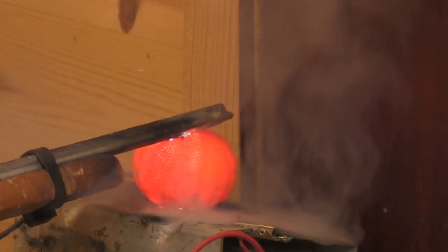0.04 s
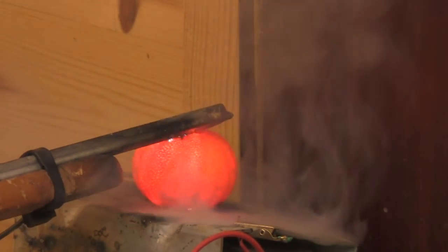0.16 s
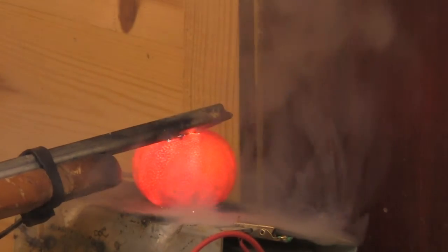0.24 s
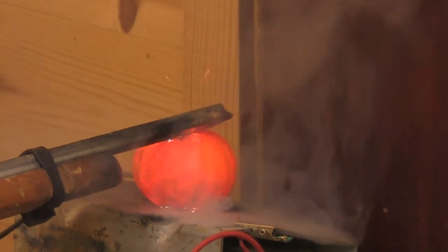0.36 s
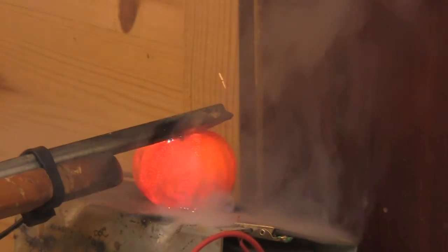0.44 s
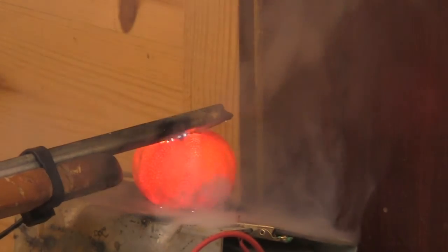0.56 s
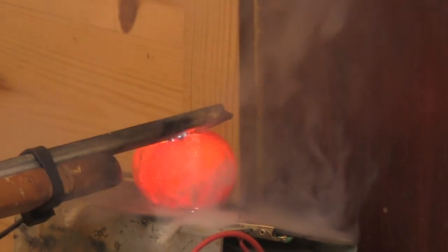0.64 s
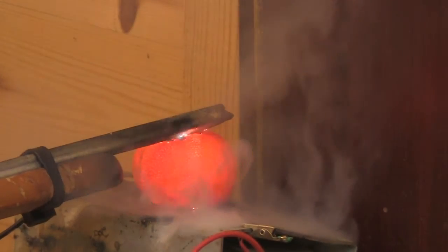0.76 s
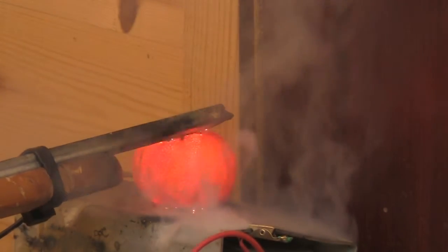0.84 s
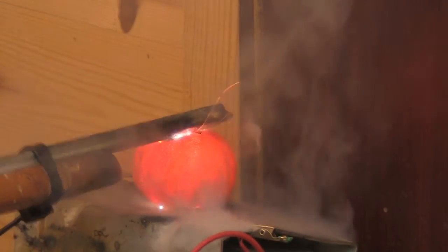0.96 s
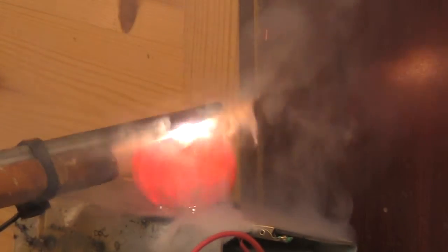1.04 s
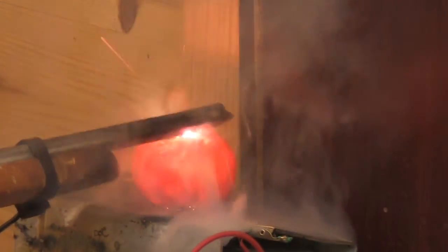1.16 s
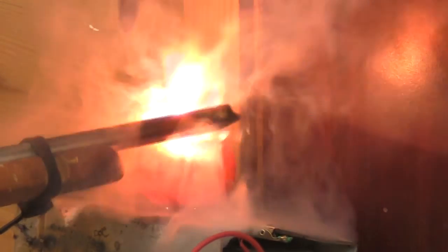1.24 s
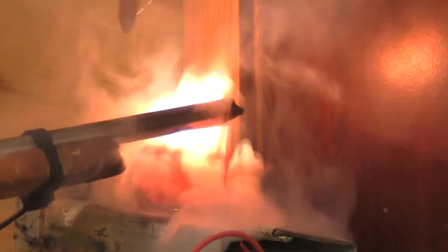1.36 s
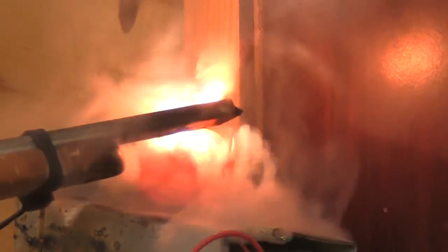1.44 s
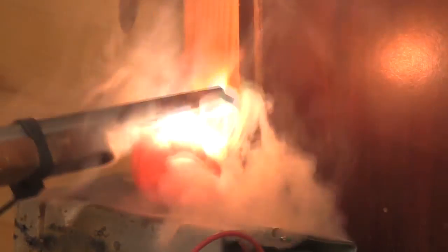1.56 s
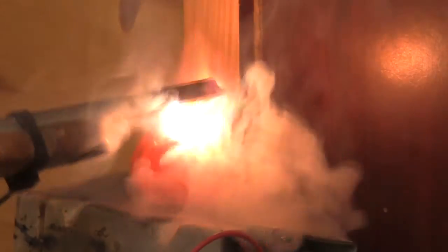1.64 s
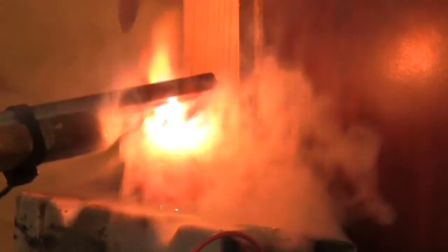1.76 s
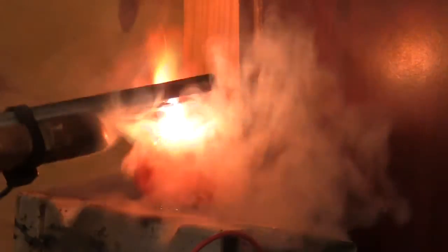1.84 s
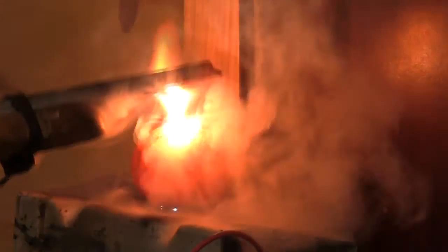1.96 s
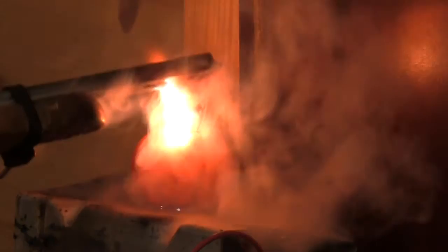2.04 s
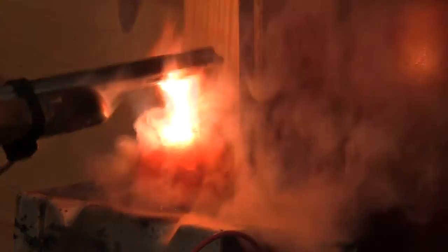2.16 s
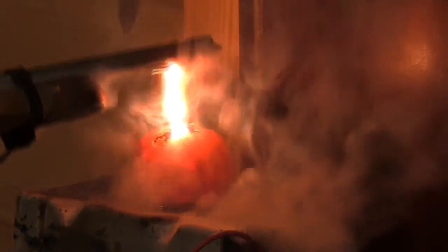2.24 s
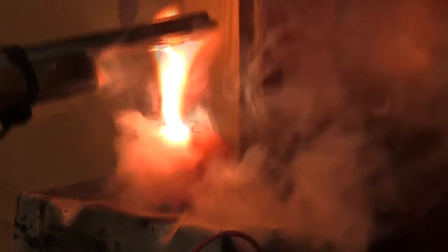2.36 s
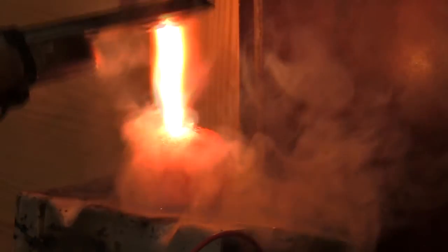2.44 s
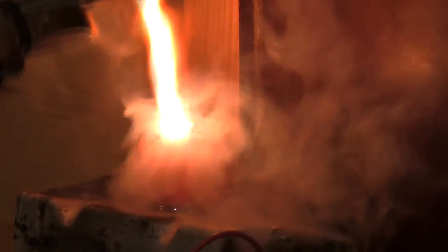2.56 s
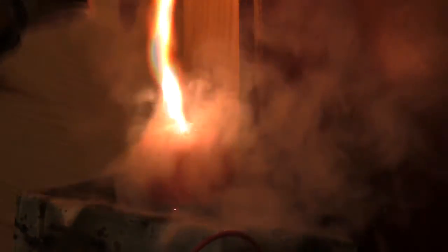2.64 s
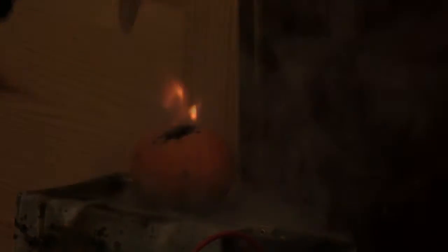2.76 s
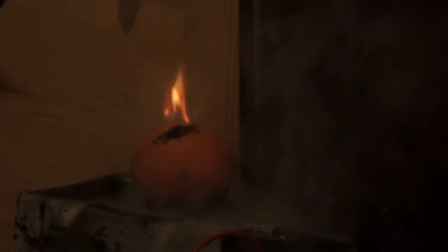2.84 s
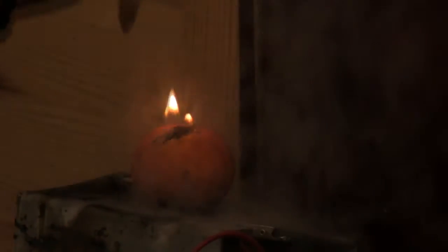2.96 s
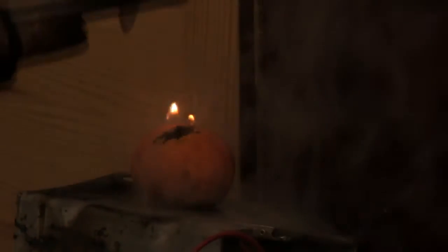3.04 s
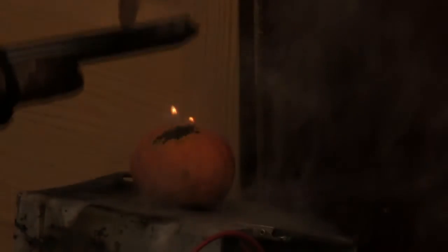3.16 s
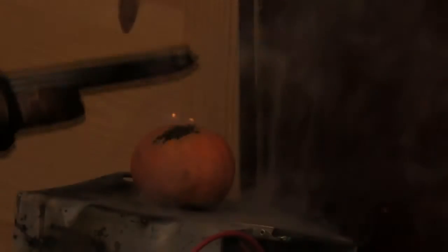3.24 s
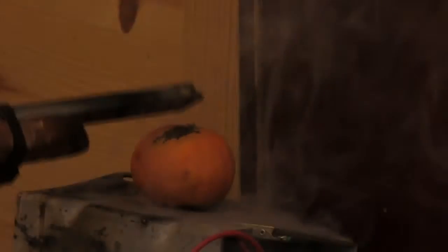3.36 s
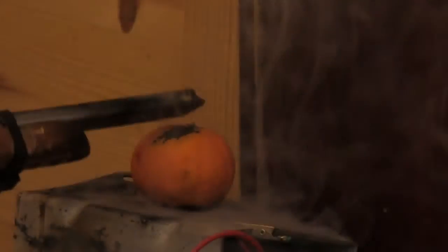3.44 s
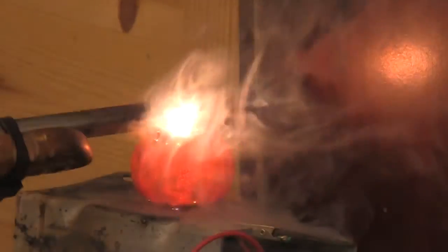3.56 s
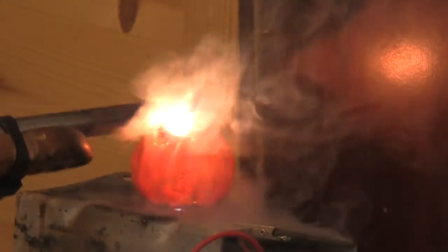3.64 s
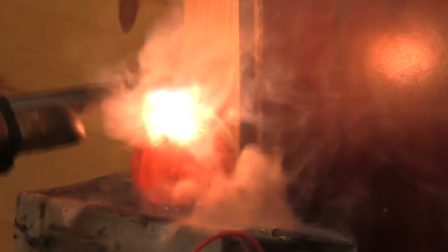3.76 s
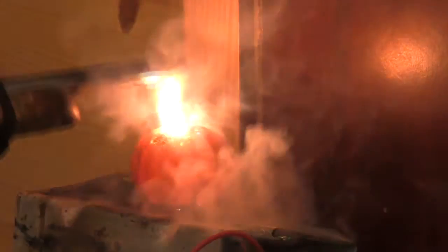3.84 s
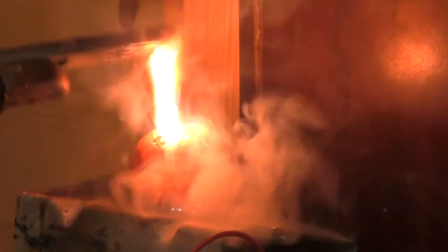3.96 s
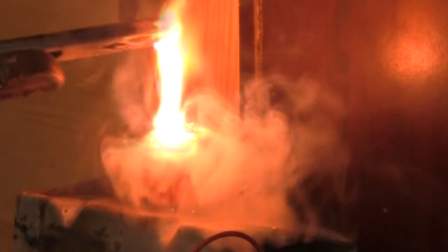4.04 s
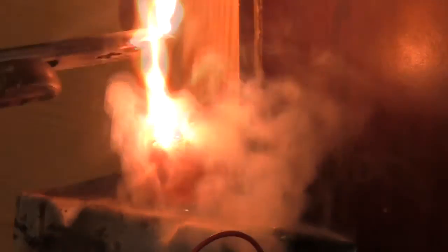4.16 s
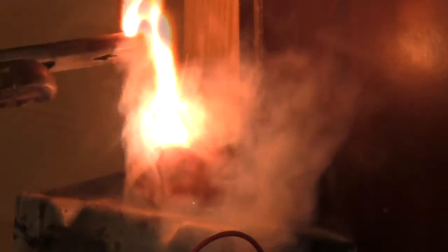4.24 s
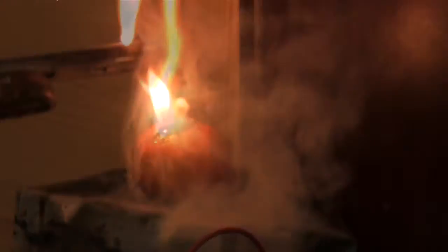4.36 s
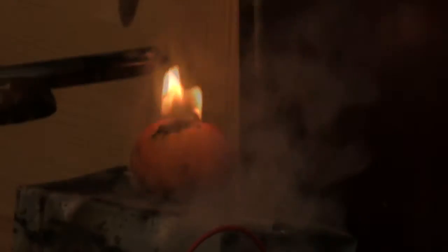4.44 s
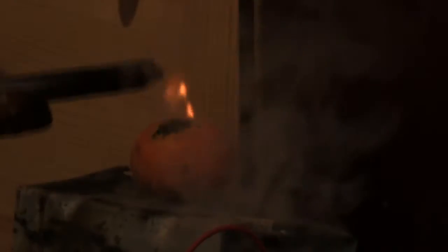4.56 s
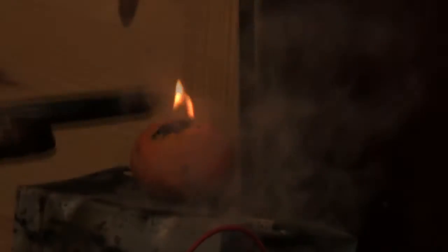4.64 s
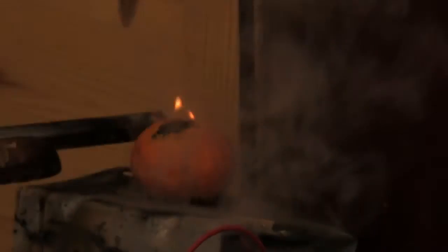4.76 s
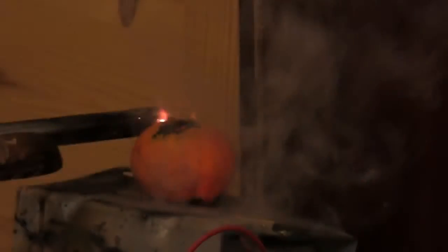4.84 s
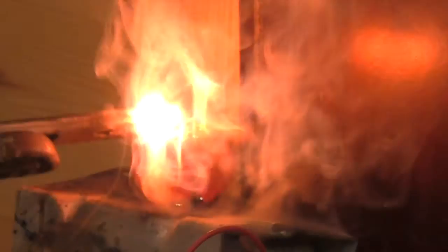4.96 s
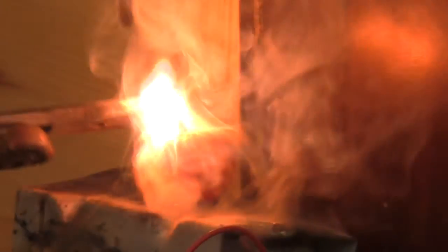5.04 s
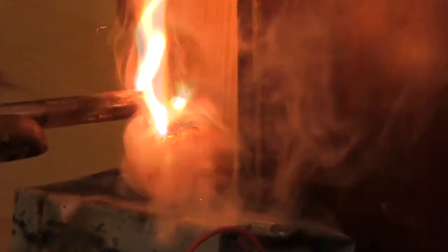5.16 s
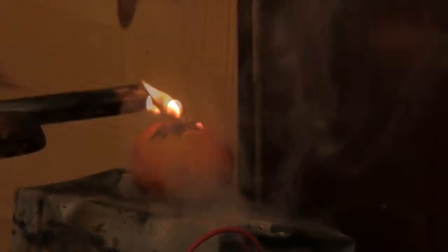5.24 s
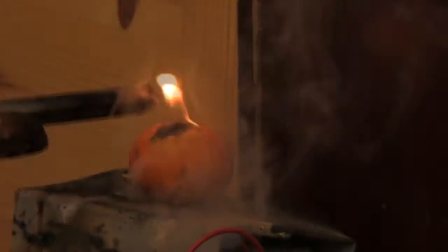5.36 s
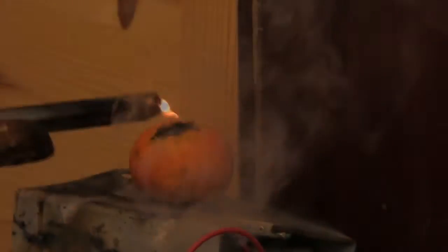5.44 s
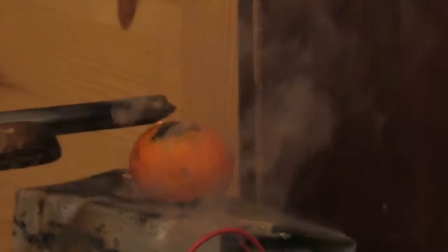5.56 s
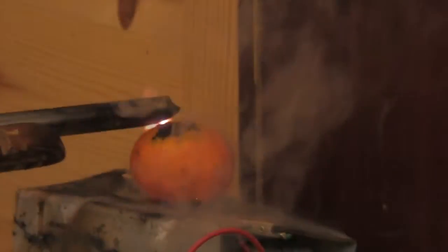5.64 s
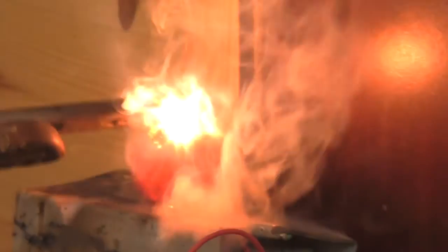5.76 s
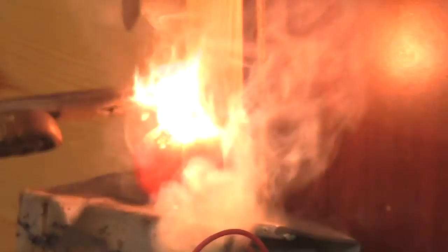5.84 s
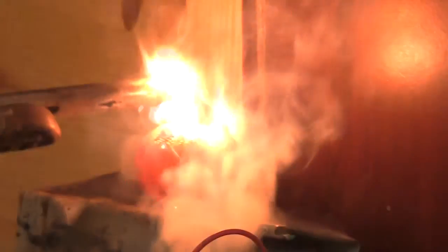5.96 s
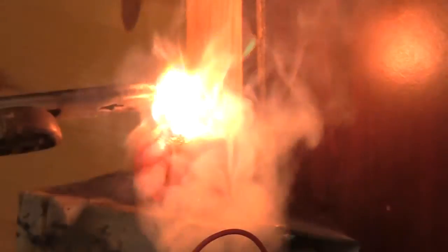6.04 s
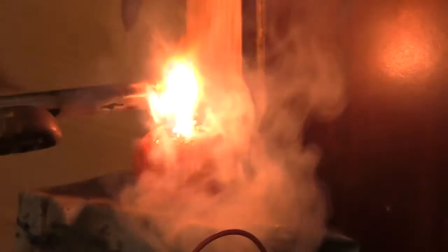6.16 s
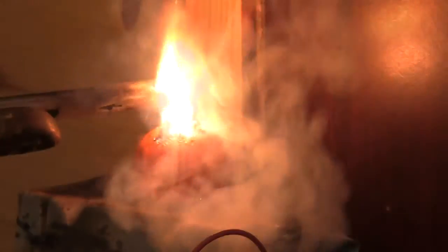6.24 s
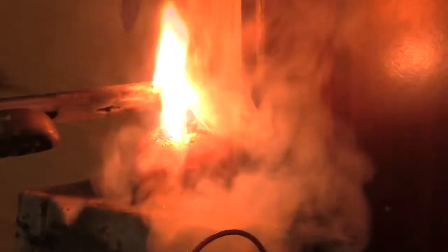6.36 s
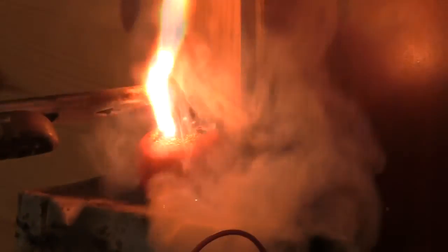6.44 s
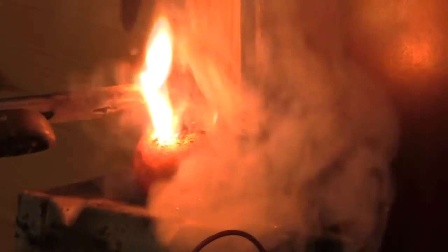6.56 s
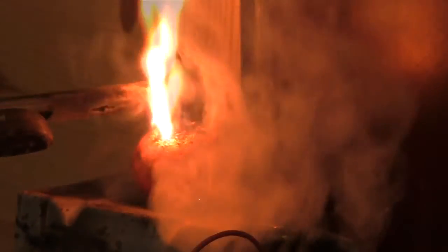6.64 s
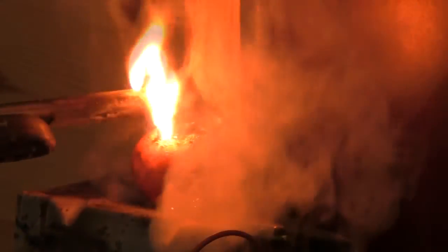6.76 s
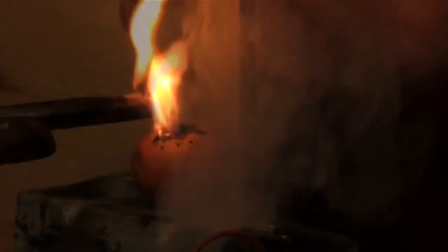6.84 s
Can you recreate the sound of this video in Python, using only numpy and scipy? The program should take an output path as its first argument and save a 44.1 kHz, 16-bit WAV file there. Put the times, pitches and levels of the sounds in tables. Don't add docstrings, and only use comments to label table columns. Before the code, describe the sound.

Heard close up in stereo in a small room, a harsh 100 Hz mains buzz and bright, pulsing sizzle of boiling juice are running from the start. A sharp crack comes at 1.1 s; around 1.25 s flame bursts through with a roar, steam and a cluster of pops until 1.65 s. The buzz grows fuller and rougher, with more snaps near 2.0 and 2.5-2.6 s. At 2.77 s it stops abruptly, leaving faint transformer hum, a little spitting and simmer. The arc slams back at 3.6 s and cuts at 4.44 s. A weak, crackling restrike at 4.81 s catches with a whoosh at 5.0 s and dies at 5.23 s. Quiet hum and a soft drop hiss at 5.5 s follow. At 5.65 s it restarts with rapid pops, the loudest crack at 5.75 s, then buzzes steadily with another pop at 6.6 s, ending abruptly about 6.9 s into quiet hum.

```python
import sys
import numpy as np
from scipy import signal
from scipy.fft import rfft, irfft
from scipy.io import wavfile
from scipy.ndimage import uniform_filter1d

SR = 44100
rng = np.random.default_rng(int(sys.argv[2]) if len(sys.argv) > 2 else 0)


def persist_wave(psi):
    counts = np.round(np.clip(psi, -1, 1) * 32767).astype(np.int16)
    wavfile.write(sys.argv[1], SR, np.atleast_2d(counts).T)


def field_ratio(decibels):
    return 10 ** (np.asarray(decibels, dtype=float) / 20)


N = 304731
T, HZ = np.arange(N) / SR, np.fft.rfftfreq(N, 1 / SR)
MAINS_HZ = 49.86
TURN = 2 * np.pi * MAINS_HZ * T - 1.96
BUZZ_FALL_DB_S = 211

# (strike [s], break [s], one-sidedness of the current [dB], fine fizz [dB])
BURNS = [
    (0, 2.765, -13, -16),
    (3.592, 4.436, -15, -14),
    (4.812, 5.233, -17, -13),
    (5.647, 6.897, -17, -13),
]


def buzz():
    # (harmonic [multiple of mains], index of its drive [0-3], level [dB])
    harmonics = [(2, 3, 1.5), (3, 1, -17), (4, 0, 0.5), (5, 1, 2), (6, 0, -9), (7, 1, -19.5), (8, 2, -3),
                 (9, 1, -30), (10, 2, -3), (12, 2, -20.5), (13, 2, -16.5), (14, 2, -11.5), (18, 2, -23.5)]
    on, after, current_db, _, length, odd_db, _ = arc()
    touch_s, lift_s = 0.83, 0.3
    touch = np.clip(1 - (T - touch_s) / lift_s, 0, 1)

    odd_drive_db = odd_db + 10 * touch
    long_db = -19 + 16 * length
    second_db = -33 + 21.5 * length ** 1.9 - 16 * touch
    second_fall_db_s = 26
    second_db = second_db + (BUZZ_FALL_DB_S - second_fall_db_s) * after
    drives_db = [0 * T, odd_drive_db, long_db, second_db]
    waver = 1 + 0.06 * drift(27)
    wander_db = (0.12, 0.8, 0.95, 0.65)
    drives_db = [db + wander * drift(2.5) for db, wander in zip(drives_db, wander_db)]

    lag = 1.3
    wave = 0 * T
    for k, which, db in harmonics:
        wave += field_ratio(db + drives_db[which]) * np.cos(k * TURN - lag * (k > 4))

    inrush_db, inrush_t60 = -53.5, 0.55
    inrush = bursts([(strike, inrush_db, inrush_t60) for strike, *_ in BURNS[1:]], 0.02)
    jolt = field_ratio(inrush) * np.cos(2 * TURN)
    level = on * field_ratio(current_db - BUZZ_FALL_DB_S * after)
    return -np.sqrt(2) * (level * waver * wave + jolt)


def hiss():
    # (frequency [Hz], level [dB per Hz])
    sizzle_tone = [(3000, -26.5), (4500, -5.5), (5700, -5.5), (6700, 0), (7300, -1.5), (8300, 2),
                   (9600, 1.5), (10500, -2.5), (11400, -29.5)]
    fizz_tone = [(10000, -29.5), (11000, 4.5), (12500, 0.5), (13200, -5), (14900, -32), (15700, -35.5)]
    steam_tone = [(760, -17.5), (1300, -7), (1370, -1.5), (1450, -15), (1530, -6), (2200, -7.5), (3230, 2),
                  (3970, -3), (5500, -10.5), (7150, -26.5), (12100, -120)]
    roar_tone = [(60, -50.5), (140, -7.5), (170, 5), (330, -2), (600, -2), (1000, -5), (1500, -9),
                 (2000, -24.5)]
    # (frequency [Hz], width [Hz], level [dB])
    slab_modes = [(321, 32.5, 3), (425.6, 16, -1.5), (566, 22, -1.5), (650, 14, 1.5), (723, 16, 0),
                  (819, 9.8, -2), (898, 27, -1.5), (1137, 57, -0.5), (1347.6, 25, -5), (1773, 40, -4),
                  (2096.5, 27, 10.5), (2317, 20, 5), (2650, 40, -11), (3350, 170, -20.5)]
    # (time [s], roar peak [dB], steam peak [dB], t60 [s])
    flares = [(1.275, -33.5, -33.5, 4.3), (1.41, -35, -42, 0.49), (1.545, -42, -31.5, .6),
              (1.64, -36, -39, 1.3), (1.715, -51, -38, 0.34), (4.865, -47, -62, .4),
              (5.0, -26.5, -33, 0.22), (5.663, -28, -27, 0.17), (6.599, -31, -28.5, 0.17),
              (6.63, -39, -44, 0.57)]
    flare_rise_s = 0.0061

    on, after, current_db, boil_db, length, _, fizz_db = arc()
    burst_s = 1.27
    shut = np.clip((burst_s - T) / 0.02, 0, 1)
    snap_db, snap_s, fall_db_s = -3.5, 0.018, 339
    fall_db = snap_db * np.minimum(after / snap_s, 1) - fall_db_s * after
    roar_fall_db = -BUZZ_FALL_DB_S * after

    uneven = 0.42
    throb_db = 2 + 2 * length * (1 - shut)
    throb_db = throb_db * np.clip(1 + uneven * drift(20.0), 0, 3)
    current = -0.5 * np.cos(2 * TURN) + 0.33 * np.cos(TURN - 2.1) - 0.35 * np.cos(4 * TURN)
    throb_db = throb_db * current

    roar_db = -47 + 7.5 * length + 0.51 * (current_db + 35) - 3.5 * shut
    roar_flare_db = bursts([(s, db, t60) for s, db, _, t60 in flares], flare_rise_s)
    roar = np.hypot(field_ratio(roar_db + roar_fall_db), field_ratio(roar_flare_db + roar_fall_db))
    steam_db = -35 + 0.76 * (boil_db + 31)
    steam_flare_db = bursts([(s, db, t60) for s, _, db, t60 in flares], flare_rise_s)
    steam = np.hypot(field_ratio(steam_db + fall_db), field_ratio(steam_flare_db + fall_db))
    boil = field_ratio(boil_db + fall_db)
    fizz = field_ratio(fizz_db + 5 * shut + 0.68 * throb_db)

    slab = 0.39 + sum(field_ratio(db) / (1 + (2 * (HZ - hz) / width) ** 2) for hz, width, db in slab_modes)
    out = crackle(field_ratio(read(sizzle_tone)), 230, 9.7, 0.053, 0.89) * boil * field_ratio(throb_db)
    out += crackle(field_ratio(read(fizz_tone)), 296, 4.9, 0.2, 0.73) * boil * fizz
    out += crackle(field_ratio(read(steam_tone)) * slab ** 0.51, 300, 4.0, 0.04, 0.94) * steam * field_ratio(0.33 * throb_db)
    flutter = field_ratio(2.0 - 1.1 * np.cos(4 * TURN))
    out += crackle(field_ratio(read(roar_tone)) * slab, 100, 3.2, 0.14, 0.74) * roar * flutter
    return out * on


def arc():
    # (time [s], current [dB], juice boiling [dB], arc length [0-1])
    course = [
        [(0.1, -36, -28.5, 0.6), (.7, -35.5, -31, 0.52), (1.19, -35, -26.5, 0.55), (1.32, -32.5, -29.5, .9),
         (1.9, -34.5, -31, 0.63), (2.25, -30.5, -30.5, 0.72), (2.4, -31.5, -32, 0.77), (2.66, -32.5, -32, 0.81),
         (2.76, -35.5, -40, 0.91)],
        [(3.59, -36.5, -29, 0), (3.69, -35, -28, 0.2), (3.9, -32, -31.5, 0.55), (4.05, -33, -33.5, 0.7),
         (4.22, -33.5, -33, 0.95), (4.42, -34, -36, .95)],
        [(4.812, -65, -60, .4), (4.86, -46, -41.5, 0.6), (4.95, -57, -37, 1.07), (5.02, -34, -34, 1),
         (5.07, -34, -31, 0.67), (5.17, -32, -32, 0.7), (5.24, -34, -36, 0.93)],
        [(5.647, -39, -28, 1), (5.715, -43.5, -34, 1.2), (5.79, -36, -31, 0.62), (5.94, -32.5, -31, 0.42),
         (6.3, -31.5, -32, 0.46), (6.6, -31, -32, 0.88), (6.88, -33, -34, 0.78)],
    ]
    burn = np.searchsorted(np.transpose(BURNS)[0], T, "right") - 1
    strike, end, odd_db, fizz_db = np.transpose(BURNS)[:, burn]
    s, *curves = np.transpose(np.concatenate(course))
    held = np.minimum(T, end)
    on = np.clip((T - strike) / 0.0023 + (strike == 0), 0, 1)
    return on, T - held, *[np.interp(held, s, c) for c in curves], odd_db, fizz_db


def patchy(x, patchy_db=1.0):
    hz, t, z = signal.stft(x, SR, nperseg=256)
    field = rng.standard_normal((len(t), len(hz))).T
    field = uniform_filter1d(field, size=5, axis=0)
    field = evened(uniform_filter1d(field, size=30, axis=1))
    return signal.istft(z * field_ratio(patchy_db * field), SR, nperseg=256)[1][:, :N]


def pops():
    # (time [s], peak [dB], low body relative to peak [dB], ring t60 [s])
    skin_pops = [(1.1134, -15, -21, 0.0091), (1.2546, -24, -10, 0.0091), (1.4161, -23, -10, 0.0097),
                 (1.457, -19, -20, 0.0086), (1.475, -20.5, -27, 0.012), (1.4955, -15.5, -30, 0.009),
                 (1.5175, -34.5, -12.5, 0.016), (1.6498, -24, -3, 0.0081), (1.9776, -20, -17, 0.01),
                 (2.5173, -21.5, -8, 0.01), (2.6188, -25, -24, 0.0094), (2.6399, -20, -18.5, 0.01),
                 (4.5346, -52, -11, 0.01), (4.816, -35, -25, 0.01), (4.8436, -33, -19, 0.013),
                 (4.8656, -27, -17, 0.016), (4.9658, -21, -25, 0.0088), (4.9858, -21.5, -16, 0.015),
                 (5.0064, -29, 0, 0.024), (5.4959, -62, -6, 0.0075), (5.6494, -21, -7, 0.014),
                 (5.6666, -16, -2.5, 0.0063), (5.6894, -20.5, -4, 0.0075), (5.708, -21.5, -5, 0.01),
                 (5.7292, -23, -15, 0.013), (5.747, -6, -21, 0.0047), (5.7633, -23.5, -21, 0.0084),
                 (6.605, -16.5, -8, 0.0056), (6.8608, -30, -18, 0.013)]
    # (frequency [Hz], level [dB])
    crack_tone = [(1500, -32), (2800, -19), (3400, -9.5), (4500, -35), (6000, -22), (7500, -15), (9600, -3),
                  (11000, -22), (15000, -45)]
    crack, body, t = np.zeros((2, N)), np.zeros((2, N)), np.arange(4000) / SR
    for s, db, body_db, t60 in skin_pops:
        at = round(s * SR)
        noise = rng.choice([-1., 1.], (4, len(t))) * np.minimum(t / 0.0008, 1)
        sharp = noise[:2] * field_ratio(db - 60 * t / t60)
        dull = noise[2:] * field_ratio(db + body_db - 60 * t / (4 * t60))
        crack[:, at:at + len(t)] += sharp[:, :N - at]
        body[:, at:at + len(t)] += dull[:, :N - at]
    high = evened(field_ratio(read(crack_tone)))
    low = evened(field_ratio(read([(150, -33), (500, 1.5), (2500, 2), (5000, -27.0)])))
    return field_ratio(4.5) * ports(*crack, high) + field_ratio(1.5) * ports(*body, low)


def room(x, t60=0.3, apart=0.18, dull=0.55):
    t = np.arange(SR // 2) / SR
    sign = rng.choice([-1., 1.], (3, len(t)))
    sparse = (rng.random((3, len(t))) < 0.05) * (t > 0.002)
    taps = sign * sparse * field_ratio(-60 * t / t60)
    taps = taps[0] + apart * taps[1:]
    late = np.clip(t / 0.056, 0, 1)
    taps = (1 - late) * taps + late * signal.lfilter([1 - dull], [1, -dull], taps)
    return signal.fftconvolve(x, taps / np.linalg.norm(taps[0]), axes=1)[:, :N]


def background():
    # (harmonic [multiple of mains], level [dB rms])
    idle = [(2, -57.5), (3, -70), (4, -58), (7, -77), (8, -64.5), (10, -65.5)]
    # (time [s], level [dB], t60 [s])
    spits = [
        (2.8, -52, 0.3),
        (3.02, -62.5, 1.5),
        (4.5, -61, 0.75),
        (4.62, -66, 8.1),
        (5.3, -58, 0.18),
    ]
    # (time [s], level [dB], t60 [s])
    drop_on_rod = (5.494, -61, 0.75)
    # (frequency [Hz], level [dB per Hz])
    simmer_tone = [(1500, -22.5), (2500, -2), (3500, -7), (4500, -6), (5500, -13.5), (9000, -9),
                   (12000, -31)]
    drop_tone = [(2000, -28.5), (2900, 0), (3500, 1), (4300, 0), (5000, -25)]
    air_tone = [(15, -50), (40, -28), (62, -6), (82, -23), (150, -13), (300, -17), (500, -21),
                (1000, -21.5), (1800, -26), (3000, -37), (5500, -40), (9800, -38.5), (11500, -45),
                (15000, -55)]
    hum = sum(-np.sqrt(2) * field_ratio(db) * np.cos(2 * np.pi * k * MAINS_HZ * T) for k, db in idle)
    simmer = crackle(field_ratio(read(simmer_tone)), 60, 5.0, 0.11, 1.2) * field_ratio(bursts(spits, 0.0067))
    simmer += crackle(field_ratio(read(drop_tone)), 200, 5.0, 0.3, 1.5) * field_ratio(bursts([drop_on_rod], 0.0015))
    air = crackle(field_ratio(read(air_tone)), 18, 3.0, 0.061, 1.2) * field_ratio(-56.5)
    burning = 1. * (arc()[1] < 0.08)
    return (hum + simmer + air) * field_ratio(-8 * uniform_filter1d(burning, size=4410))


def crackle(gain, per_s, spread_db, share, flicker_db):
    size = field_ratio(spread_db * np.minimum(rng.exponential(1, N), 5)) * (rng.random(N) < per_s / SR)
    burst = evened(signal.lfilter([1], [1, -0.96], size))
    noise = rng.standard_normal((2, N)) * (1 + share * burst)
    a, b = noise * field_ratio(flicker_db * drift(46))
    out = ports(a, b, gain)
    return out / np.sqrt(np.mean(out.mean(0) ** 2))


def ports(a, b, gain):
    # (frequency [Hz], likeness of the ports [0-1])
    likeness = [(30, 0.46), (100, 0.95), (1000, 0.94), (2400, 0.99), (5000, 0.76), (9000, 0.84),
                (12000, 0.48)]
    # (frequency [Hz], left minus right [dB])
    balance = [(60, 0), (400, .6), (700, 1), (1300, 0), (2400, -.8), (4400, -2.5), (8000, -5.5),
               (10500, -6), (11500, -11), (15000, -13)]
    # (frequency [Hz], phase lead of the left port [rad])
    lead = [(0, 0), (2700, -.1), (6000, -.5), (10000, -.5), (11000, -1.2), (12000, -3.2), (14000, -4)]
    a, b, same = rfft(a) * gain, rfft(b) * gain, np.clip(read(likeness), 0, 1)
    left = a * np.exp(1j * read(lead)) * field_ratio(read(balance) / 2)
    right = (same * a + np.sqrt(1 - same ** 2) * b) * field_ratio(-read(balance) / 2)
    return irfft(np.array([left, right]), N)


def bursts(rows, rise_s):
    power = 1e-12 + 0 * T
    for s, db, t60 in rows:
        rise = np.clip((T - s) / rise_s, 0, 1)
        fall_db = 60 * np.maximum(T - s - rise_s, 0) / t60
        power += rise ** 2 * field_ratio(2 * (db - fall_db))
    return 10 * np.log10(power)


def drift(hz):
    return evened(irfft(rfft(rng.standard_normal(N)) / (1 + (HZ / hz) ** 2), N))


def evened(x):
    return x / np.sqrt(np.mean(x ** 2) + 1e-20)


def read(points, hz=HZ):
    f, value = np.transpose(points)
    return np.interp(np.log(hz + 1), np.log(f + 1), value)


def scene():
    noisy = patchy(hiss()) + pops()
    return buzz() + noisy + field_ratio(-9.0) * room(noisy) + background()


def top_cut(x):
    return signal.sosfilt(signal.butter(12, 15840, fs=SR, output="sos"), x)


def record(dry):
    low_hz, edge_hz = 32, 15750
    band = (HZ < edge_hz) / (1 + (low_hz / (HZ + 1)) ** 3)
    return top_cut(irfft(rfft(dry) * band, N))


dry = scene()
out = record(dry)
persist_wave(out)
```